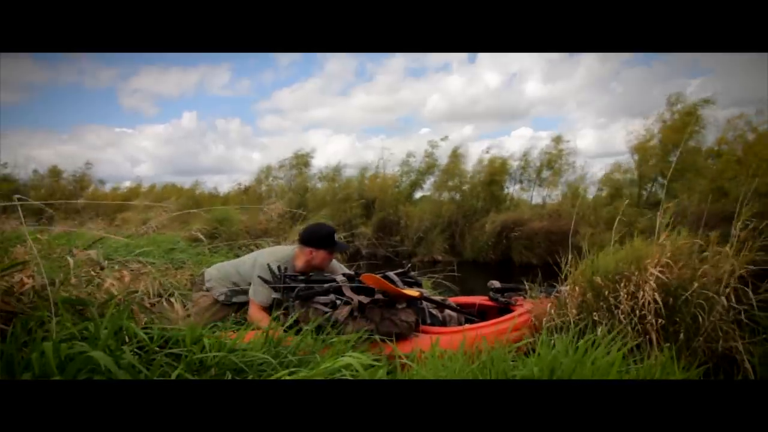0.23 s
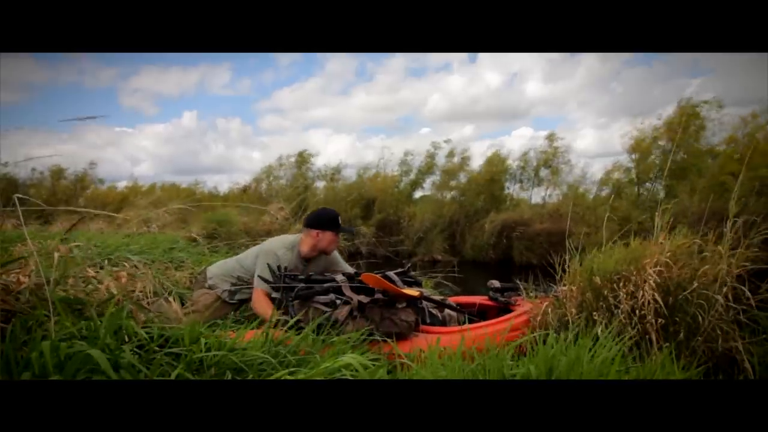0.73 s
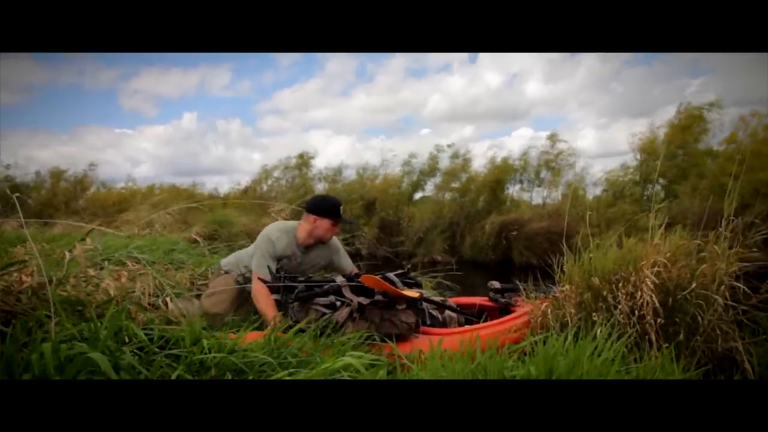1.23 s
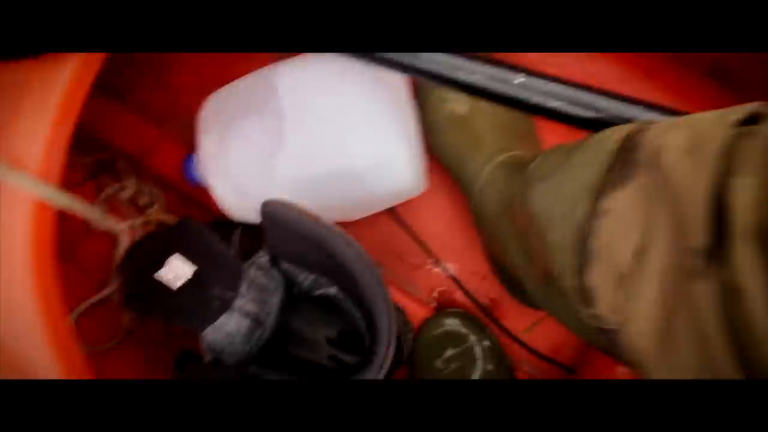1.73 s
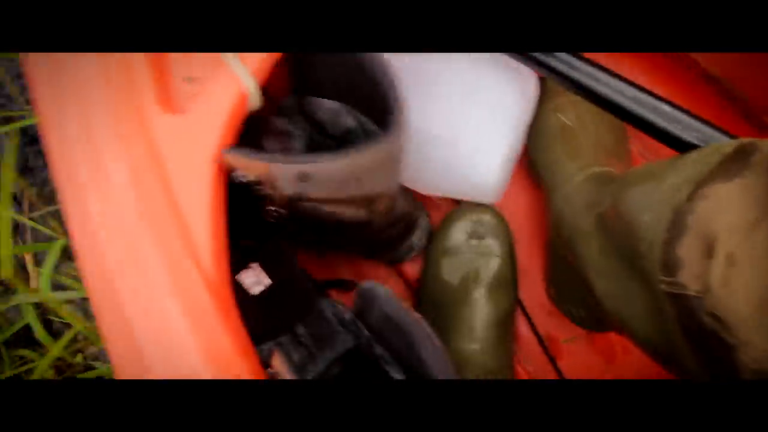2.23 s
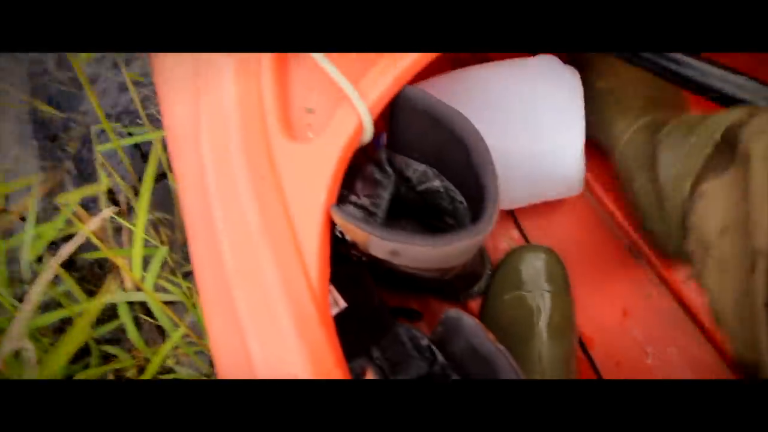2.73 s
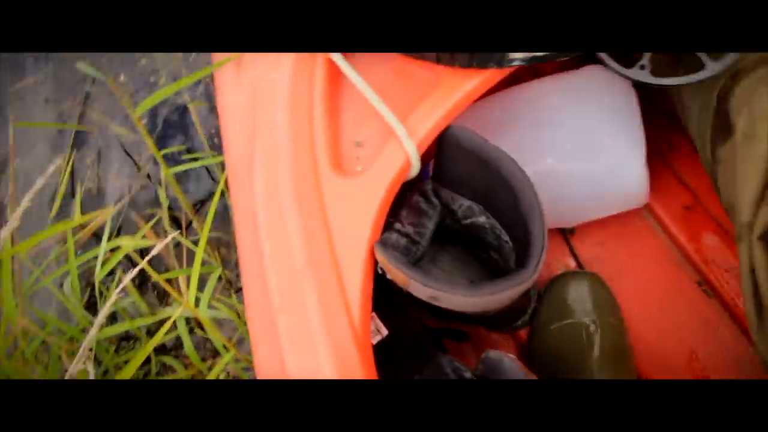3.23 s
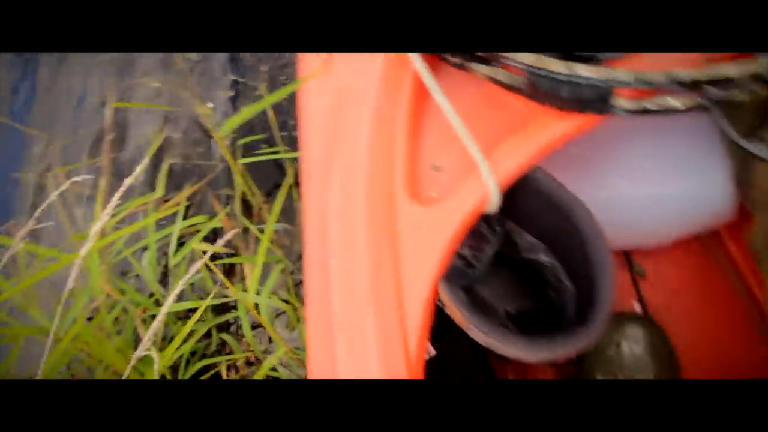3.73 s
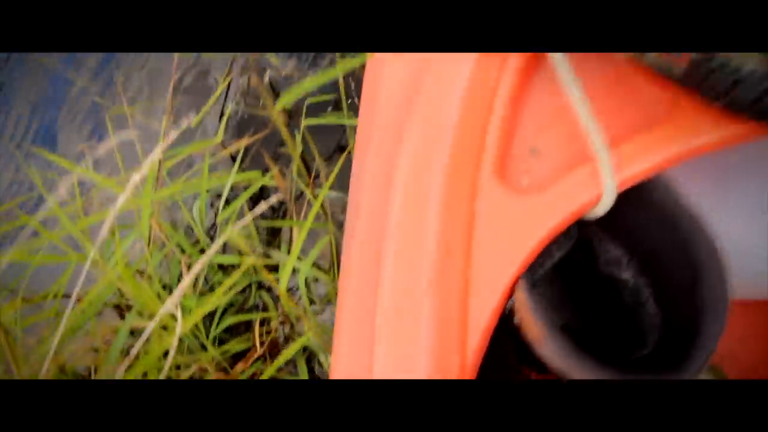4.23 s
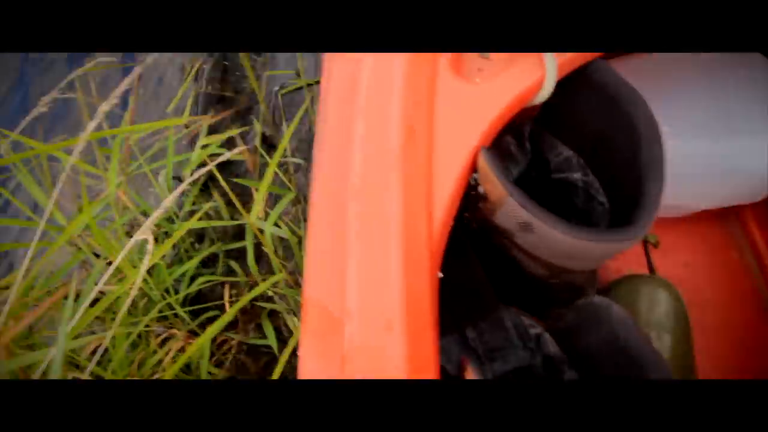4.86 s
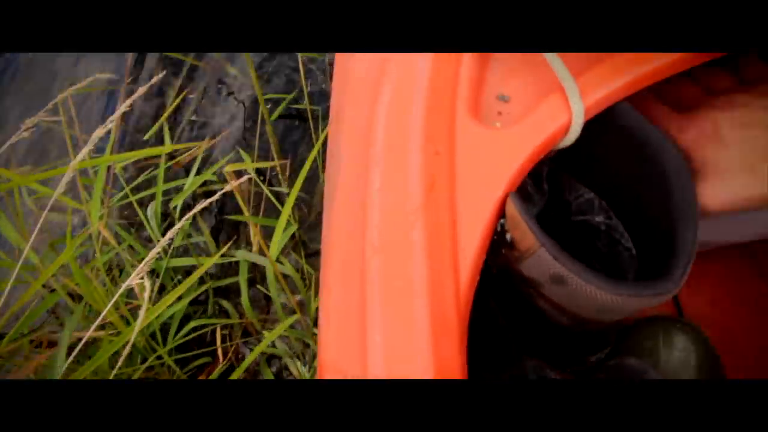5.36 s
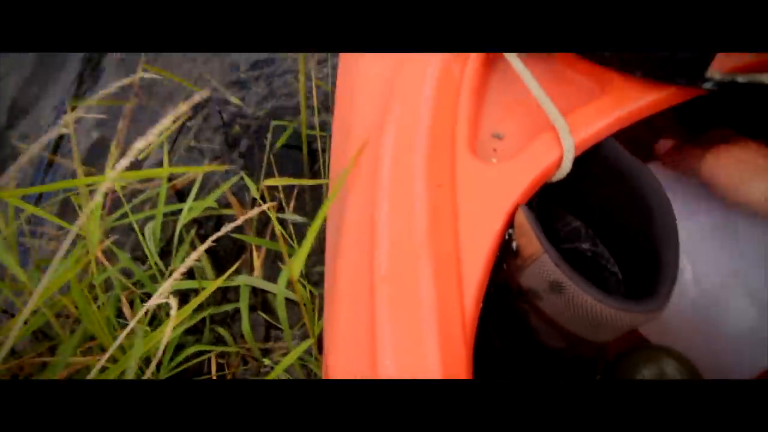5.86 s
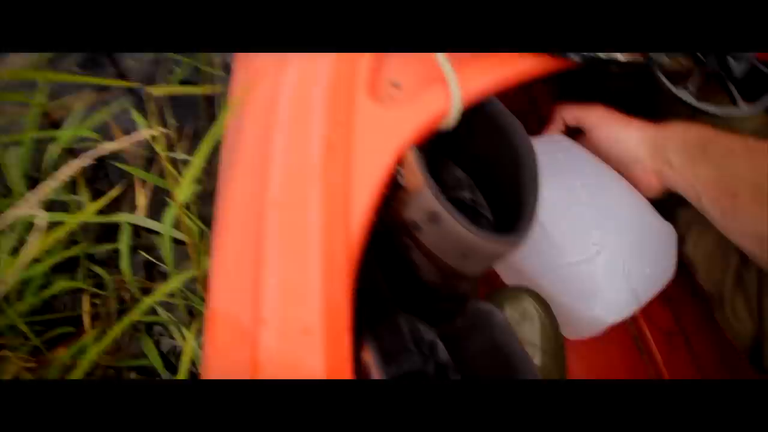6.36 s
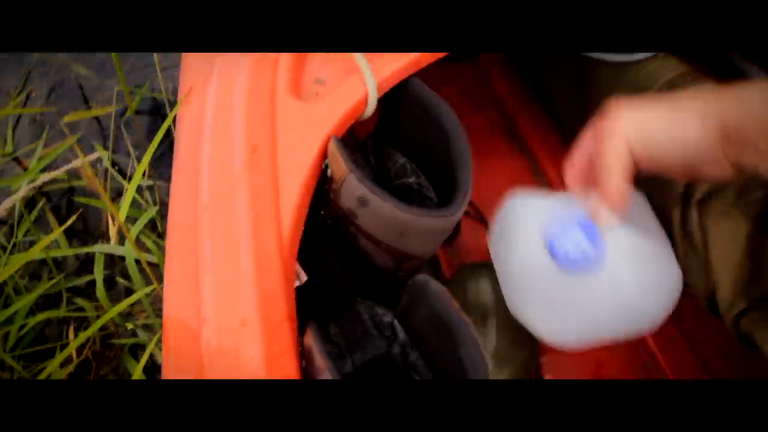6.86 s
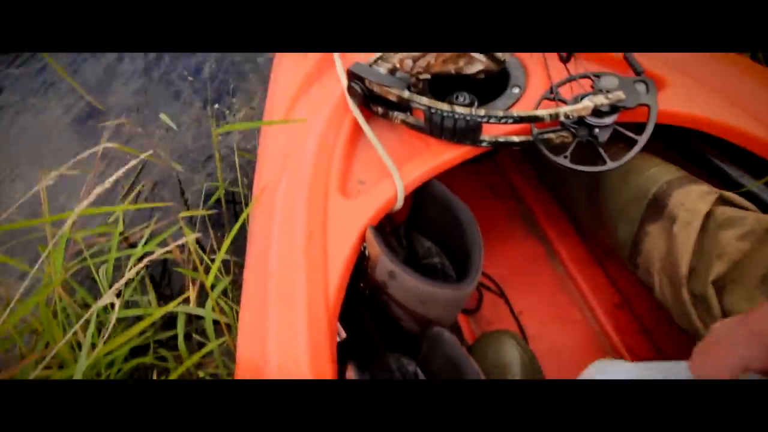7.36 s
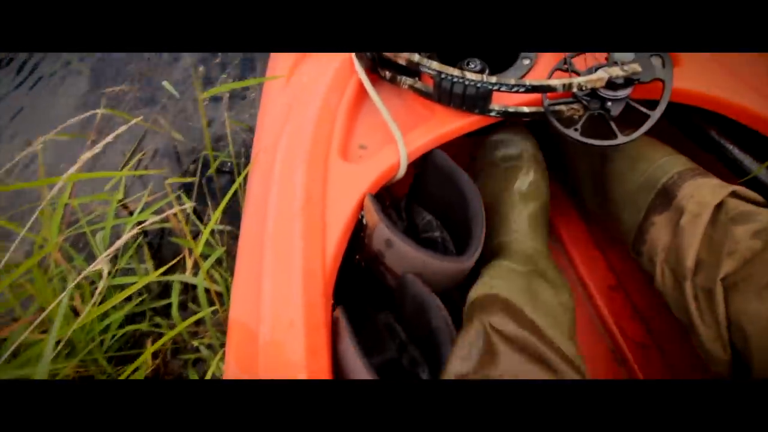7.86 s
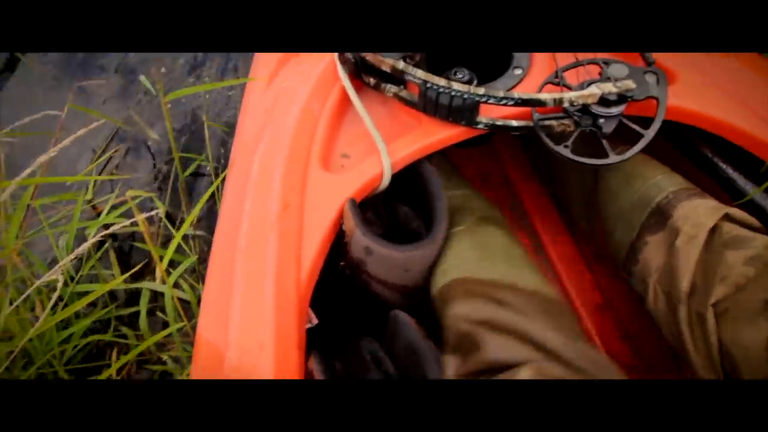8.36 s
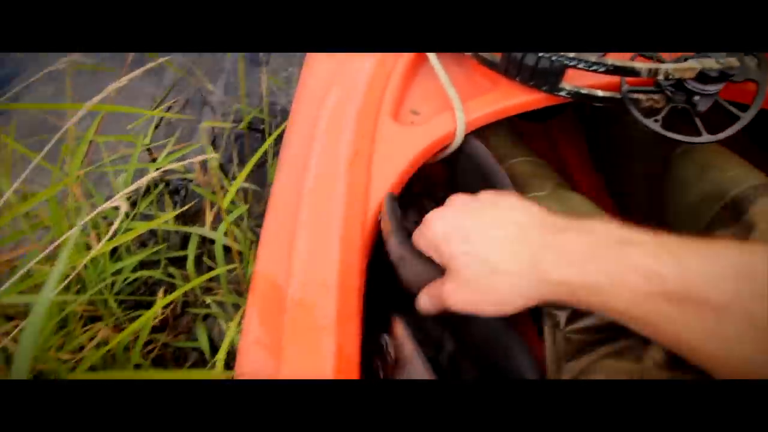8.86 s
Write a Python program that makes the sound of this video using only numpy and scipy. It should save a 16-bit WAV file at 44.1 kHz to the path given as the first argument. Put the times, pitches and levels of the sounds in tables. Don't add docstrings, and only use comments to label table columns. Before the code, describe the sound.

A plastic kayak is shoved through dry grass with sharp snaps, wind rumble and rubbery squeals, then boots, a jug and gear thump inside its hollow hull.

```python
import sys
import numpy as np
from scipy import signal
from scipy.io import wavfile
from scipy.ndimage import uniform_filter1d

SR = 44100
rng = np.random.default_rng(int(sys.argv[2]) if len(sys.argv) > 2 else 0)


def magnitude_from_level(level_db):
    exponent = np.asarray(level_db, float) / 20
    return 10 ** exponent


def dump(signal):
    limited = np.clip(np.atleast_2d(signal).T, -1, 1)
    pcm = np.round(limited * 32767).astype(np.int16)
    wavfile.write(sys.argv[1], SR, pcm)


N = 400869

# pitch in Hz, level in dB, t60 in seconds.
HULL = [(75.3, -5, 0.3), (87.2, 3.5, 0.16), (103, -4, 0.44), (151.8, 1.5, 0.24), (194.1, 0.5, 0.2),
        (261, -6, 0.17), (293, -22, 0.19)]
# pitch in Hz, level in dB, t60 in seconds.
PANELS = [(325, -12, 0.033), (458.7, -5, 0.17), (612, -6.5, 0.13), (706, -4.5, 0.087), (840, -10, 0.08),
          (1140, -27, 0.074), (1317, -13.5, 0.063)]
# pitch in Hz, width in Hz, level in dB.
SHELL = [(1427, 264, 10), (1850, 510, 9.5), (2250, 425, 5.5), (2720, 530, 5.5), (3235, 270, 8.5),
         (3526, 495, 8), (4100, 313, -17.5)]
# pitch in Hz, width in Hz, level in dB.
DECK = [(1510, 210, 8.5), (1840, 140, 10), (2440, 484, 12.5), (2860, 33, 10), (3104, 180, 8),
        (3850, 78, 11.5), (4040, 1900, -3), (5280, 314, -15.5)]


def blows(hiss):
    # start in seconds, strength in dB, brightness in dB, ring t60 in seconds.
    deck_snaps = [(.5287, -22, 30.5, 0.25), (.619, -5, -19, 0.056), (.6252, -9, -5, 0.023),
                  (.7422, -9.5, 2, 0.051), (1.0583, -29.5, 9, 0.037), (1.1204, -16.5, -4, 0.085),
                  (1.1505, -14, -16, 0.022), (1.2241, -11, -15, 0.03), (1.2796, -12, -11, 0.056),
                  (1.3925, -13.5, -17, 0.014), (1.4239, -10, 0, 0.14), (1.5204, -3.5, 13, 0.042),
                  (1.5741, -10.5, 6, 0.15), (1.705, -10, 26, 0.011), (1.8257, -16.5, 13, 0.18),
                  (1.8925, -15.5, 13, 0.09), (1.9814, -11, -16.5, 0.074), (1.9894, -15.5, -26, 0.0017)]
    # start in seconds, strength in dB, hardness in dB, ring t60 in seconds.
    boot_thumps = [(.4103, -26.5, -25, 0.023), (2.5675, -5.5, -8, 0.1), (2.955, -12.5, 4.5, 0.14),
                   (3.217, -29, 2, 0.36), (3.308, -9, -4, 0.046), (3.52, -21, 6, 0.054),
                   (3.647, -32.5, -4, 0.23), (3.902, -31, 3.5, 0.084), (4.16, -15.5, -19, 0.078),
                   (4.335, -27.5, -7, 0.19), (4.638, -29.5, 2, 0.12), (4.937, -11.5, -3, 0.084),
                   (5.013, -20.5, 4, 0.1), (6.467, -33, 11, 0.1), (6.883, -29.5, -2, 0.1),
                   (7.092, -17, -66, 0.069), (7.285, -13.5, -6, 0.074), (7.374, -20.5, -3.5, 0.048),
                   (7.479, -41, 15.5, 0.038), (7.559, -29.5, 9, 0.075), (7.605, -27.5, 2.5, 0.095),
                   (7.843, -25.5, -1, 0.24), (7.883, -10.5, 2.5, 0.017), (7.936, -17.5, -13, 0.025),
                   (8.003, -31, -6, 0.047), (8.037, -20.5, -38, 0.07), (8.317, -33.5, 6.5, 0.48),
                   (8.426, -27.5, 0, 0.026), (8.476, -24.5, 0, 0.023), (8.9762, -25, 14.5, 0.11)]
    # start in seconds, strength in dB, hardness in dB, ring t60 in seconds.
    jug_knocks = [(4.593, -38.5, 11.5, 0.099), (4.846, -39.5, 9.5, 0.11), (5.451, -32.5, -10, 0.034),
                  (5.487, -20.5, 5.5, 0.21), (5.589, -28, 10.5, 0.093), (5.675, -25.5, -12, 0.3),
                  (5.886, -15.5, 12.5, 0.053), (6.034, -41.5, 13, 0.17), (6.08, -38, 11, 0.06),
                  (6.2407, -8, 5, 0.072), (6.409, -39.5, 13, 0.047), (6.58, -30, 5, 0.12),
                  (6.631, -28.5, 12.5, 0.04), (6.731, -29.5, -16, 0.18), (6.783, -30, -36, 0.013),
                  (7.245, -27, 5, 0.26), (7.98, -29, -17, 0.087), (8.889, -19, 7, 0.17),
                  (9.036, -42, 14, 0.028)]
    # start in seconds, strength in dB, brightness in dB, ring t60 in seconds.
    gear_ticks = [(.7488, -19, -13.5, 0.083), (.98, -30, -18, .025), (2.517, -28.5, -13, 0.14),
                  (2.854, -21, -11, 0.017), (2.921, -32, -33.5, .055), (2.1125, -15, -7, 0.065),
                  (3.308, -23, -14, 0.032), (4.7281, 1, -20, 0.063), (5.589, -31.5, -3, 0.36),
                  (6.106, -22.5, -13.5, 0.063), (7.245, -33.5, -5, .24), (7.728, -28.5, -13.5, 0.94),
                  (8.317, -34.5, -3.5, 0.58), (8.805, -27, -11, 0.025), (8.9762, -13.5, -6, 0.062),
                  (9.036, -23, -7, 0.023), (6.2407, -33, 3, 0.016)]
    # start in seconds, strength in dB.
    stem_breaks = [
        (1.5367, -17),
        (1.5594, -19),
        (1.5667, -18),
        (1.5944, -14),
        (1.6137, -15),
        (1.6305, -17),
    ]
    snap_kind = (0.0, -22, -21, -43.5), (0.0, 0.55, 0.5074, 1.0)
    boot_kind = (0.0, 0.0039, -4, -25.5), (1.0, 0.082, 0.02, 1.37)
    jug_kind = (0.0, -15.5, 0.0055, -48), (1.0, 0.2, 0.0055, 2.5)
    gear_kind = (0.0, -51, 0.53, 1), (0.0, 2, 1.28, 1)

    bank = as_blows(deck_snaps, snap_kind)
    aboard = np.vstack([as_blows(boot_thumps, boot_kind), as_blows(jug_knocks, jug_kind),
                        as_blows(gear_ticks, gear_kind)])
    s, crack_db, thump_db, knock_db, tick_db, t60 = np.vstack([bank, aboard]).T
    hardness_db = crack_db - thump_db

    thump_tilt_db = 0.14 * (knock_db - thump_db)
    thump = struck(HULL, s + 0.004, thump_db - 17.5, thump_tilt_db, contact_s=0.001, spread_db=8.5)
    knock_tilt_db = 0.18 * (hardness_db - 8.0)
    knock = struck(PANELS, s, knock_db - 9.0, knock_tilt_db, contact_s=0.00029, spread_db=4.0)

    white = rng.standard_normal((2, N))
    rattle = rms_one(band(white[0], 313, 1160)) * envelopes(s, knock_db - 7.5, 2.05 * t60, 0.00067)
    rumble = rms_one(band(band(white[1], 125, 285), 91, 380))
    tumble = rumble * envelopes(s, thump_db - 5.5, 2.45 * t60, 0.00233)

    stems = as_blows([(at, db + 2.0, -10, .04) for at, db in stem_breaks], snap_kind)
    outside = np.vstack([bank, stems])
    crack = cracks(outside, DECK, click_db=7.0, burst_db=-18.5, tail_db=-23.5, tilt=0.3)
    crack = crack + cracks(aboard, SHELL, click_db=7.4, burst_db=-14.5, tail_db=-17.0, tilt=0.13)

    tick = band(hiss, 2500, 11000) * envelopes(s, tick_db - 6.0, 0.6 * t60, .0001)
    snap = band(band(clicks_at(s, tick_db + 10.5), 4800, 15000), 3000, 16000)
    push_db = knock_db + 16.0 + 0.46 * np.clip(hardness_db, -20, 25)
    push = band(band(clicks_at(s, push_db), 400, 2105), 244, 3000)
    return thump + tumble + band(knock + rattle, 260, 4240) + band(crack, 1400, 6100) + tick + snap + push


def as_blows(rows, kind):
    s, db, colour_db, t60 = np.transpose(rows)
    levels_db = db[:, None] + np.array(kind[0]) + colour_db[:, None] * np.array(kind[1])
    return np.column_stack([s, levels_db, t60])


def struck(modes, times, level_db, tilt_db, contact_s, spread_db):
    chance, out = rng.standard_normal((len(times), len(modes))), 0
    rough = 1 + .6 * rng.standard_normal(N)
    fade = np.exp(-1 / (contact_s * SR))
    middle_hz = modes[len(modes) // 2][0]
    for k, (hz, db, t60) in enumerate(modes):
        mode_db = level_db + db + tilt_db * np.log2(hz / middle_hz) + spread_db * chance[:, k]
        push = rough * signal.lfilter([1 - fade], [1, -fade], clicks_at(times, mode_db) + 1e-18)
        r, w = magnitude_from_level(-60 / (t60 * SR)), 2 * np.pi * hz / SR
        ring = signal.lfilter([0, np.sin(w)], [1, -2 * r * np.cos(w), r * r], push)
        out = out + (-1) ** k * ring
    return out


def cracks(table, peaks, click_db, burst_db, tail_db, tilt):
    s, crack_db, thump_db, knock_db, tick_db, t60 = np.transpose(table)
    lean_db, out = np.clip(tilt * (tick_db - knock_db + 15), -6, 6), 0
    grit = grains(3000, spread_db=3.0, smooth=0.53)
    for side, half in ((-0.92, peaks[:3]), (1.0, peaks[3:])):
        level_db = crack_db + side * lean_db
        burst = envelopes(s, level_db + burst_db, 0.3 * t60, 0.000069)
        tail = envelopes(s, level_db + tail_db, 2.23 * t60, 0.00078)
        out = out + shell(clicks_at(s, level_db + click_db) + (burst + tail) * grit, -14.0, half)
    return out


def standing_notes():
    # start in seconds, pitch in Hz, peak in dB, t60 in seconds.
    booms = [(2.569, 92, -16.5, 0.47), (2.57, 177, -6.5, 0.13), (2.958, 86, -13, 0.29),
             (2.97, 248, -32, 0.12), (3.235, 94.5, -21, 0.23), (3.315, 192.5, -14, 0.15),
             (3.522, 193, -18.5, 0.078), (4.162, 94.3, -17, 0.13), (4.165, 213, -24, 0.16),
             (4.337, 220.6, -29, 0.13), (4.641, 84.3, -25.5, 0.57), (4.645, 298, -29, 0.18),
             (4.937, 90, -24, 0.21), (4.936, 174, -21.5, .12), (4.937, 297, -21, 0.19),
             (5.015, 85.6, -26.5, 0.3), (5.495, 97, -43, 0.52), (5.713, 248, -32, 0.17),
             (6.285, 134, -32, 0.17), (6.49, 179, -32.5, 0.2), (6.853, 180, -28, 0.2),
             (6.955, 180, -28, 0.057), (7.1, 194, -23, 0.12), (7.29, 84.2, -14.5, 0.34),
             (7.292, 214, -14.5, 0.11), (7.56, 94.1, -32.5, 0.5), (7.848, 161, -24, 0.2),
             (7.885, 120, -14, 0.2), (7.905, 197.4, -20, 0.24), (7.936, 93, -28, 0.26),
             (8.045, 86.5, -30, 0.67), (8.895, 253, -28, 0.1), (8.99, 96, -25, 0.21),
             (8.99, 295, -20, 0.077)]
    # start in seconds, pitch in Hz, peak in dB, t60 in seconds.
    knock_notes = [(2.566, 695, -11.5, 0.024), (2.571, 1095, -13, 0.094), (2.958, 1370, -26, 0.13),
                   (3.245, 394, -34, 0.2), (3.309, 403, -21, .05), (3.31, 555, -24, 0.093),
                   (3.521, 370, -19.5, 0.019), (4.162, 446, -28, 0.066), (4.639, 390, -34, 0.087),
                   (4.648, 504, -35, 0.069), (4.937, 408, -16, 0.023), (4.938, 983, -29, 0.12),
                   (5.014, 405, -30.5, 0.053), (5.487, 573, -22, 0.052), (5.887, 1355, -16.5, 0.033),
                   (6.243, 476, -17.5, 0.11), (6.2395, 572, -8.5, 0.026), (6.2405, 913, -14, 0.03),
                   (6.241, 1340, -12.5, 0.048), (6.241, 1840, -13, 0.035), (6.292, 676, -30, 0.066),
                   (6.745, 404, -34.5, 0.087), (6.783, 452, -30, 0.038), (6.887, 493, -31, .06),
                   (7.286, 1080, -17, 0.023), (7.85, 410, -30.5, 0.13), (7.884, 515, -21.5, 0.024),
                   (7.985, 376, -34.5, 0.12), (8.042, 523, -29.5, 0.046), (8.808, 597, -36, 0.02),
                   (8.891, 1160, -24, 0.061), (8.977, 550, -27, 0.054), (9.04, 945, -34, 0.056)]
    # start in seconds, pitch in Hz, peak in dB, t60 in seconds.
    pings = [(1.705, 1270, -28, 0.02), (1.778, 2000, -33, 0.032), (1.87, 2810, -31, 0.066),
             (2.338, 2030, -35, 0.022), (3.019, 2270, -32, 0.035), (3.175, 1360, -42, .03),
             (3.26, 1490, -31, 0.02), (5.544, 1475, -32, 0.025), (5.593, 2000, -26, 0.044),
             (5.676, 1370, -32, .03), (5.696, 1590, -29, 0.037), (4.926, 1900, -44.5, 0.018),
             (6.41, 1470, -36.5, 0.054), (6.433, 3980, -36, .02), (6.732, 1390, -34, 0.037),
             (6.87, 2090, -40, .03), (6.992, 2140, -38, 0.037), (7.264, 2340, -29.5, 0.089),
             (8.348, 1560, -37, 0.032), (8.877, 3500, -36, .03), (8.891, 1640, -21, 0.025),
             (8.908, 1680, -21, 0.022), (8.926, 1570, -22, 0.028), (8.942, 1650, -26, 0.024)]
    hull = notes(booms, rise_cycles=0.41, sag=0.049)
    panels = notes(knock_notes, rise_cycles=1.0, sag=0.03)
    return hull + panels + notes(pings, rise_cycles=1.9, sag=0.0075)


def notes(rows, rise_cycles, sag):
    out, t = np.zeros(N + SR // 2), np.arange(SR // 2) / SR
    for s, hz, db, t60 in rows:
        cycles = hz * (t + sag * t60 / 7 * (1 - np.exp(-7 * t / t60)))
        shape = (1 - np.exp(-hz * t / rise_cycles)) ** 2 * magnitude_from_level(-60 * t / t60)
        out[round(s * SR):][:len(t)] += magnitude_from_level(db) * shape / shape.max() * np.sin(2 * np.pi * cycles)
    return out[:N]


def squeaks():
    # time in seconds, slips per second in Hz, level in dB.
    slip_runs = [
        [(.431, 2230, -34), (.441, 1930, -20), (.449, 1900, -21), (.4535, 1640, -19), (.458, 1600, -17),
         (.4605, 1960, -18), (.4645, 2000, -18), (.4672, 2230, -11), (.4695, 2200, -24)],
        [(.4695, 2050, -26), (.490, 2000, -31), (.500, 2200, -33), (.512, 2100, -37), (.527, 2200, -39)],
        [(2.0165, 270, -18), (2.030, 400, -12), (2.038, 520, -13), (2.043, 740, -11), (2.052, 830, -11),
         (2.057, 1000, -8), (2.063, 1150, -8), (2.069, 1290, -12)],
        [(2.069, 2840, -8), (2.071, 2840, -2), (2.074, 2660, -2), (2.0815, 3050, -3)],
        [(2.0815, 1600, -15), (2.085, 1700, -11), (2.089, 1830, -4), (2.100, 1830, -6), (2.106, 2150, -8),
         (2.1075, 2180, -16)],
    ]
    skips_db = [0.4, 1.0, 0.8, 2.5, 2.8]
    out = np.zeros(N)
    for rows, skip_db in zip(slip_runs, skips_db):
        first, last = round(rows[0][0] * SR), round(rows[-1][0] * SR)
        clock = np.arange(first, last) / SR
        rate_hz, level_db = [c[first:last] for c in in_time(rows)]
        rough = .016 + (125 / rate_hz) ** 2 + .004 * np.clip(-20 - level_db, 0, 15)
        jitter = 1 + rough * rms_one(band(rng.standard_normal(last - first), 91, 440))
        cycle = np.cumsum(rate_hz * np.clip(jitter, .3, 3)) / SR
        times = np.interp(np.arange(int(cycle[-1]) + 1), cycle, clock)
        uneven_db = 1.2 + (700 / np.interp(times, clock, rate_hz)) ** 2
        slip_db = uneven_db * rng.standard_normal(400)[:len(times)]
        slip_db = slip_db + skip_db * (-1) ** np.arange(len(times))
        slips = clicks_at(times, slip_db)[first:last]
        slips = slips + .04 * rng.standard_normal(last - first)
        ringing = shell(slips, -14.5, DECK)
        ringing = ringing + magnitude_from_level(-6.0) * band(slips, 550, 1530) + magnitude_from_level(-3.0) * band(slips, 3700, 4400)
        ringing = band(band(ringing, 340, 5300), 200, 5600)
        even = np.sqrt(uniform_filter1d(ringing ** 2, size=400) + 1e-9)
        out[first:last] += magnitude_from_level(level_db) * ringing / even
    return out


def rubbing(hiss):
    # peak time in seconds, peak in dB, rise in seconds, fall in seconds, panel pressure in dB.
    drags = [(.001, -57.5, .1, 1, 8), (.6, -41, 0.31, 0.25, -10), (1.081, -41, 0.095, 0.18, 6),
             (1.34, -53.5, 0.37, 0.81, 12), (1.588, -26.5, 0.29, 0.21, -2), (2.11, -28.5, 0.14, 0.16, 6),
             (2.26, -35.5, 0.16, 0.066, 5.5), (2.71, -45.5, 0.75, 0.29, 5.5),
             (3.021, -38.5, 0.15, 0.026, 3.5), (3.5, -49, 0.74, 0.72, 1.5), (4.15, -42.5, 0.25, 0.43, -2.5),
             (5.71, -35, 0.3, 0.26, -4), (5.98, -45.5, 0.19, 0.23, -5), (6.288, -62.5, 0.081, 0.088, 23.5),
             (6.6, -42.5, 0.29, 0.25, 1), (6.76, -42.5, 0.071, 0.054, 2.5), (6.9, -45, 0.12, 0.13, 6),
             (7.05, -49.5, 1, 1, -3.5), (7.67, -49, 0.7, 0.99, -20.5), (8.12, -41.5, 0.2, 0.2, 1),
             (8.5, -54, 0.45, 0.93, -2), (8.908, -33, 0.041, 0.037, -4), (9.08, -48, 0.58, .3, 7.5)]
    # peak time in seconds, peak in dB, rise in seconds, fall in seconds.
    flexes = [(.6, -34.5, 0.66, 0.36), (1.08, -38, 0.39, 0.42), (1.5, -33, 0.72, 4.3),
              (1.85, -49, 0.53, 0.46), (2.19, -22.5, 0.17, 0.18), (2.34, -39.5, 0.52, 0.052),
              (2.78, -43, 0.4, 0.58), (3.25, -41, 0.45, 2.5), (3.66, -29.5, 0.13, 0.12),
              (4.15, -37, 0.49, 0.84), (4.89, -36, 0.53, 0.25), (5.6, -34.5, 0.22, 0.36),
              (6.35, -41.5, 0.94, 0.7), (7.05, -37.5, 0.54, 0.13), (7.58, -35, 0.57, 0.35),
              (8.07, -31.5, 0.25, 0.4), (8.42, -27.5, 0.13, 0.094), (8.92, -21.5, 0.054, 0.18)]
    # time in seconds, level in dB.
    rustle = [(0.0, -47.5), (.5, -53.5), (1.0, -51), (3.4, -55.5), (3.8, -65), (4.4, -55), (5.3, -58.5),
              (6.42, -63), (6.53, -55), (6.8, -49), (7.6, -53), (7.95, -47), (8.7, -55.5), (9.09, -71)]
    rustle_db, = in_time(rustle)
    stroke, pressed = swells(drags), swells(drags, np.array(drags)[:, 4])
    drag = grains(1500, spread_db=2.5, smooth=0.43)
    lumps = rng.standard_normal(N) * magnitude_from_level(3.2 * drift(11.1))
    groan = sum(magnitude_from_level(db) * resonate(lumps, hz, 3.57 / t60) for hz, db, t60 in HULL)
    groan = band(groan, 37, 514)
    drag = drag * magnitude_from_level(3.0 * drift(27))
    damped_panels = [(hz, 41.5 / t60, db) for hz, db, t60 in PANELS]
    panel, rub = rub_on(drag, damped_panels), rub_on(drag, SHELL)
    flutter = magnitude_from_level(1.8 * drift(30))
    dull = band(band(hiss, 3000, 12000), 2000, 10100)
    layers = [(swells(flexes), groan), (pressed, panel), (stroke, rub),
              (magnitude_from_level(rustle_db - 4.5) * flutter, hiss), (magnitude_from_level(-17) * stroke * flutter, dull)]
    return sum(gain * rms_one(x) for gain, x in layers)


def rub_on(drag, peaks):
    out = 0
    for k, (hz, width_hz, db) in enumerate(peaks):
        out = out + magnitude_from_level(db) * resonate(np.roll(drag, 7919 * k), hz, width_hz)
    return out


def chirps():
    # start in seconds, end in seconds, first pitch in Hz, last pitch in Hz, level in dB.
    singing_rubs = [
        (1.46, 1.487, 660, 1410, -30.5),
        (2.104, 2.131, 1880, 1815, -16),
        (4.937, 5.013, 3280, 3170, -46),
        (5.995, 6.012, 2250, 1600, -43),
        (6.037, 6.053, 2370, 1950, -43),
        (6.075, 6.087, 3620, 4340, -39),
        (6.097, 6.11, 2770, 3630, -43),
    ]
    out = np.zeros(N)
    for start, end, first_hz, last_hz, db in singing_rubs:
        at, n = round(start * SR), round((end - start) * SR)
        waver, flutter = rms_one(band(rng.standard_normal((2, SR // 8)), 40, 300))[:, -n:]
        phase = 2 * np.pi * np.cumsum(np.linspace(first_hz, last_hz, n) * (1 + .025 * waver)) / SR
        out[at:at + n] += magnitude_from_level(db + 2 + 3 * flutter) * np.sin(phase) * np.hanning(n) ** .5
    return out


def whistles():
    # start in seconds, end in seconds, pitch in Hz, width in Hz, level in dB.
    thin_tones = [
        (0.043, .118, 3400, 201, -47),
        (0.042, .115, 2650, 150, -50),
        (.045, .118, 1780, 400, -45),
        (8.425, 8.45, 2140, 120, -44),
        (2.66, 2.713, 666, 30, -38),
        (3.40, 3.522, 8200, 500, -58),
        (2.107, 2.119, 2750, 300, -24),
        (6.74, 6.757, 3800, 350, -42),
    ]
    out = np.zeros(N)
    for start, end, hz, width_hz, db in thin_tones:
        first, last = round(start * SR), round(end * SR)
        tone = resonate(resonate(rng.standard_normal(SR // 8), hz, width_hz), hz, width_hz)[first - last:]
        out[first:last] += magnitude_from_level(db) * rms_one(tone) * np.hanning(last - first) ** .5
    return out


def wind():
    # peak time in seconds, peak in dB, rise in seconds, fall in seconds.
    gusts = [(.25, -47, 1.6, 0.2), (.53, -26, 2.4, 0.67), (.96, -24.5, 0.15, 1.17), (1.2, -19, 0.11, 0.28),
             (1.37, -17.5, 0.35, 0.29), (1.49, -23.5, 0.089, 0.11), (2.83, -38.5, 0.61, 1.4),
             (4.05, -29, 0.33, 0.82), (4.96, -38, 0.12, 0.29), (5.4, -46, 1.1, 0.29),
             (6.38, -46, 0.51, 0.48), (7.44, -46, .2, 0.55), (8.18, -40, 0.22, 0.98),
             (9.085, -40, 0.5, 0.18)]
    lumps = rng.standard_normal(N) * magnitude_from_level(3.6 * drift(16.0))
    return swells(gusts) * rms_one(band(band(lumps, 43, 119), 26, 330))


def grass_hiss():
    # frequency in Hz, level in dB per Hz.
    hiss_spectrum = [(2650, -9.5), (4500, -4), (5170, -23), (6460, -3.5), (8600, -7.5), (13400, -10.5),
                     (16000, -33)]
    return coloured(hiss_spectrum, patchy_db=0.0)


def marsh_air():
    # frequency in Hz, level in dB per Hz.
    air_spectrum = [(24, -30), (81, -5.5), (176, -11), (491, -22), (3650, -20.5), (5580, -54),
                    (13100, -24.5), (16000, -29.5)]
    return magnitude_from_level(-55.5) * coloured(air_spectrum, patchy_db=2.0)


def rms_one(x):
    return x / np.sqrt(np.mean(x ** 2) + 1e-20)


def in_time(rows):
    s, *columns = np.transpose(rows)
    return [np.interp(np.arange(N) / SR, s, c) for c in columns]


def drift(rate):
    r = np.exp(-80 * np.pi * rate / SR)
    slow = signal.lfilter([1], [1, -2 * r, r * r], rng.standard_normal(N // 40 + 2002))[2000:]
    return np.interp(np.arange(N) / 40, np.arange(len(slow)), rms_one(slow))


def swells(rows, extra_db=0.0):
    span_db, still_db = 20, -62.5
    t = np.arange(0, N + 32, 32) / SR
    power = magnitude_from_level(still_db) ** 2
    for (s, db, rise, fall, *_), more_db in zip(rows, np.broadcast_to(extra_db, len(rows))):
        away = np.maximum((s - t) / max(rise, .01), (t - s) / max(fall, .01))
        power = power + magnitude_from_level(db + more_db - span_db * away) ** 2
    return np.interp(np.arange(N) / SR, t, np.sqrt(power))


def envelopes(times, level_db, t60, rise_s):
    out, t = np.zeros(N + SR // 3), np.arange(SR // 3) / SR
    for s, db, fall in zip(times, level_db, np.broadcast_to(t60, len(times))):
        at = round(s * SR)
        out[at:at + len(t)] += magnitude_from_level(db - 60 * t / max(fall, .002)) * (1 - np.exp(-t / rise_s))
    return out[:N]


def clicks_at(times, level_db):
    out, at = np.zeros(N + 1), np.asarray(times) * SR
    np.add.at(out, at.astype(int), magnitude_from_level(level_db) * (1 - at % 1))
    np.add.at(out, at.astype(int) + 1, magnitude_from_level(level_db) * (at % 1))
    return out[:N]


def grains(per_s, spread_db, smooth):
    sizes = magnitude_from_level(spread_db * np.minimum(rng.exponential(1, N), 5)) * rng.choice([-1, 1], N)
    born = rng.random(N) < per_s * magnitude_from_level(5.0 * drift(25)) / SR
    return rms_one(rms_one(sizes * born) + smooth * rng.standard_normal(N))


def coloured(spectrum, patchy_db):
    out, white = 0, rng.standard_normal((2, N))
    hz, level_db = np.transpose(spectrum)
    edges = hz[0] * 2 ** np.arange(0, np.log2(hz[-1] / hz[0]) + .4, .5)
    for k, (low, high) in enumerate(zip(edges, edges[1:])):
        here_db = np.interp(np.log(low * high) / 2, np.log(hz), level_db)
        out = out + magnitude_from_level(here_db + patchy_db * drift(24)) * band(white[k % 2], low, high)
    return rms_one(out)


def band(x, low_hz, high_hz):
    edges_hz = [low_hz, min(high_hz, .45 * SR)]
    return signal.sosfilt(signal.butter(2, edges_hz, "band", fs=SR, output="sos"), x)


def resonate(x, hz, width_hz):
    r = np.exp(-np.pi * width_hz / SR)
    poles = [1, -2 * r * np.cos(2 * np.pi * hz / SR), r * r]
    return signal.lfilter(np.array([1, 0, -1]) * (1 - r * r) / 2, poles, x + 1e-18)


def shell(x, between_db, peaks):
    rings = 0
    for k, (hz, width_hz, db) in enumerate(peaks):
        rings = rings + (-1) ** k * magnitude_from_level(db) * resonate(x, hz, width_hz)
    return rings + magnitude_from_level(between_db) * band(x, 967, 3100)


def scene():
    hiss = grass_hiss()
    kayak = blows(hiss) + standing_notes() + squeaks() + rubbing(hiss) + chirps() + whistles()
    return (kayak + wind() + marsh_air())[None]


def band_limit(x):
    return signal.sosfilt(signal.butter(12, 15750, fs=SR, output="sos"), x)


def record(dry):
    top = 1.2
    dry = signal.sosfilt(signal.cheby2(10, 40, 16100, fs=SR, output="sos"), dry)
    mix = np.clip(top * np.tanh(dry / top), -1, 1)
    return band_limit(mix)


dry = scene()
out = record(dry)
dump(out)
```